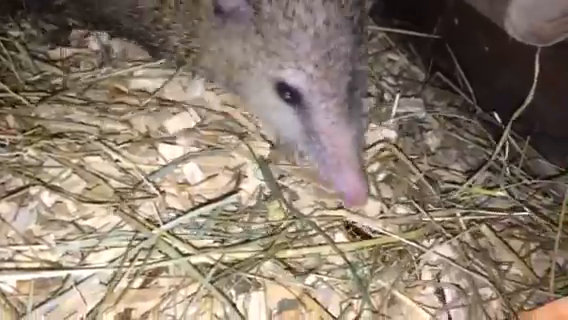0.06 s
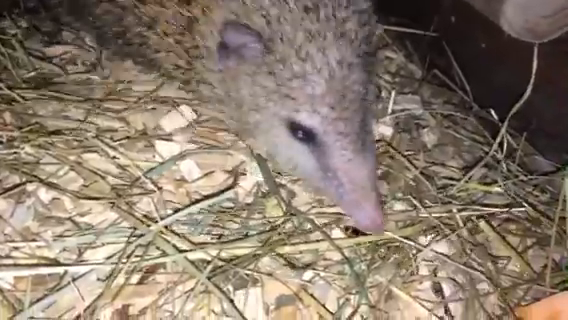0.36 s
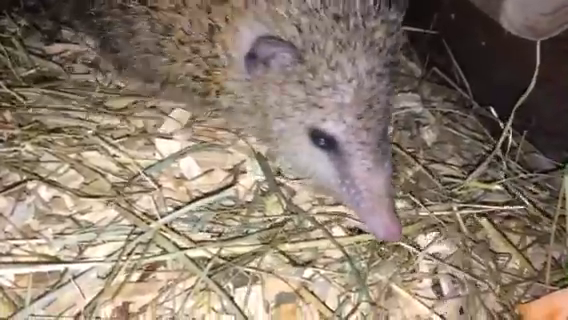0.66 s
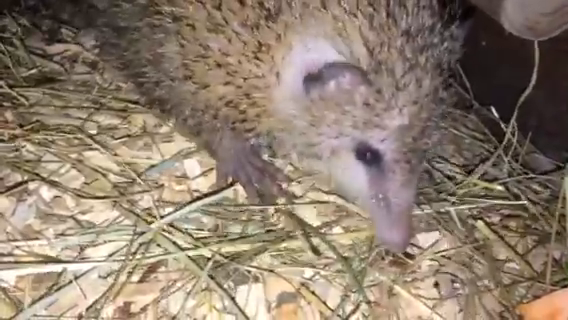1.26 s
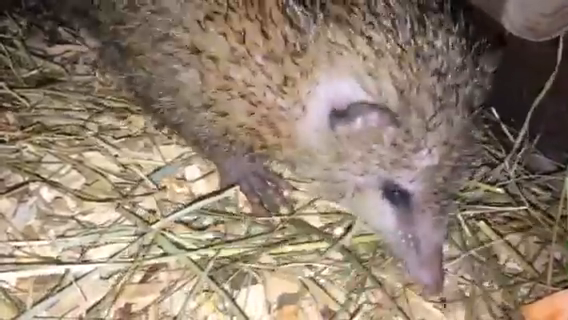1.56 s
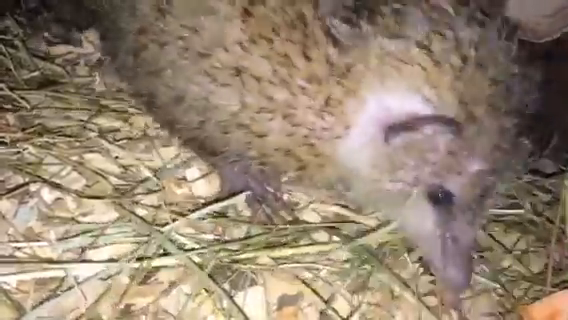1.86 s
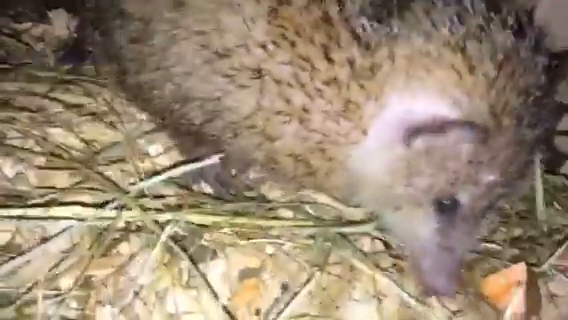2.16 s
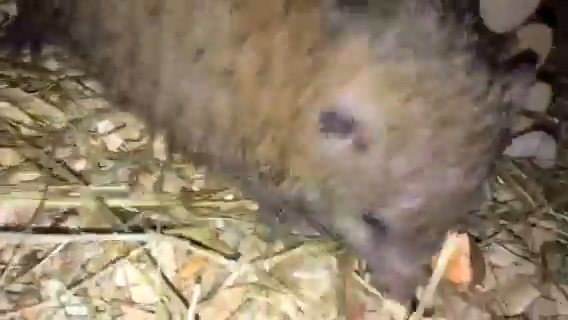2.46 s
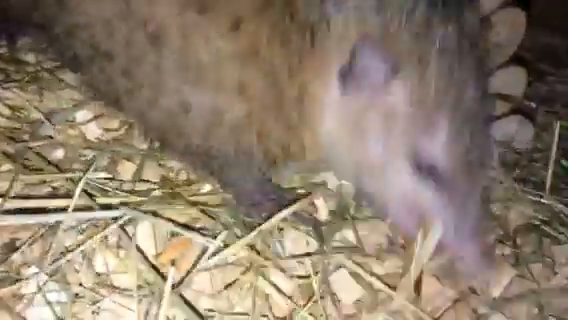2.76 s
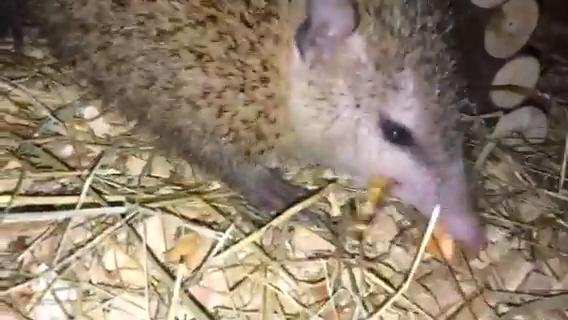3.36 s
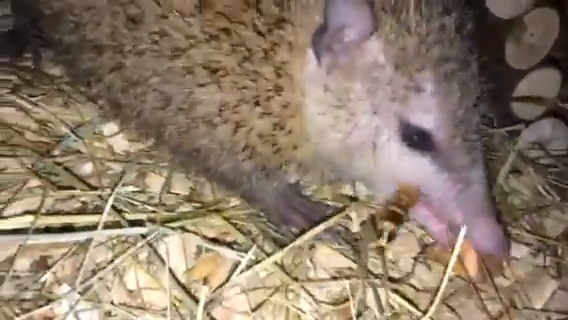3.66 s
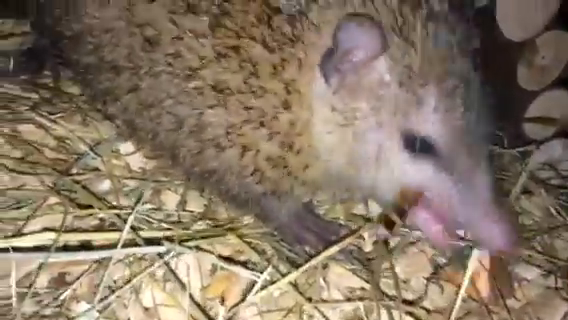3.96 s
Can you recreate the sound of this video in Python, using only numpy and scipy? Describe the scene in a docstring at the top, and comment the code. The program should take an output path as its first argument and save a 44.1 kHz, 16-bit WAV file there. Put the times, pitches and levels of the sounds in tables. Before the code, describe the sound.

A small animal sniffs and rustles through straw, then crunches a grub in wet bites.

```python
"""An indoor pen, where a small snouted animal noses through straw and wood shavings close by.
It sniffs in short puffs, stalks crackle as it stirs them, and its paws bump the hollow floor.
Then it seizes a grub and crunches it in five wet bites: the shell snaps and makes the mouth ring.
The pen walls add a short ring over a quiet room hum."""
import sys
import numpy as np
from scipy import signal
from scipy.fft import rfft, irfft
from scipy.io import wavfile

SR = 44100
rng = np.random.default_rng(int(sys.argv[2]) if len(sys.argv) > 2 else 0)


def master(y):
    """Save y as 16-bit WAV."""
    cut = np.clip(np.atleast_2d(y).T, -1, 1)
    pcm = np.round(cut * 32767)  # scale
    wavfile.write(sys.argv[1], SR, pcm.astype(np.int16))


N = 176400  # 4 seconds


def undb(db):
    """Turn decibels into a number to multiply by."""
    return 10 ** (np.asarray(db) / 20)


def unit(x):
    """Scale a sound to an average strength (rms) of 1."""
    return x / np.sqrt(np.mean(x ** 2))


def seconds(count):
    """The time of each sample, in seconds."""
    return np.arange(count) / SR


def add(out, start_s, x):
    """Mix x into out, beginning at start_s."""
    i = max(int(start_s * SR), 0)
    out[i:i + len(x)] += x[:max(N - i, 0)]


def curve(points):
    """A volume that glides through (time_s, level_db) points."""
    return undb(np.interp(seconds(N), *np.array(points).T))


def swell(peak_s, rise_s, fall_s):
    """A volume that rises and falls: 20 dB down at rise_s before the peak and fall_s after it."""
    t = seconds(N) - peak_s
    distance = np.abs(t / np.where(t < 0, rise_s, fall_s))
    return undb(-20 * np.minimum(distance ** 1.32, 10))


def wander(turns_per_s):
    """A value that drifts at random, mostly between -1 and 1."""
    return np.interp(seconds(N) * turns_per_s, np.arange(N), rng.standard_normal(N))


def colour(x, points, size=8192):
    """Make some pitches louder and others softer, following (pitch_hz, level_db) points."""
    hz, db = np.array(points).T
    grid_hz = np.arange(size // 2 + 1) * SR / size
    gains = undb(np.interp(np.log(grid_hz + 1), np.log(hz), db))
    # Build the filter so that nothing sounds ahead of the hit that causes it.
    cepstrum = irfft(np.log(gains))
    cepstrum[1:size // 2] *= 2
    cepstrum[size // 2 + 1:] = 0
    response = irfft(np.exp(rfft(cepstrum)))
    return signal.fftconvolve(x, response)[:len(x)]


def resonate(x, pitch_hz, width_hz):
    """Let a sound ring at one pitch; a narrower width rings longer."""
    return signal.lfilter(*signal.iirpeak(min(pitch_hz, SR / 2 - 1), pitch_hz / width_hz, fs=SR), x)


def grains(count, per_s=5500, spread_db=4):
    """A dense crackle of tiny breaks, very unequal in size."""
    breaks = rng.random(count) < per_s / SR
    signs = rng.choice([-1, 1], count)
    sizes = undb(spread_db * np.clip(rng.standard_normal(count), -2.5, 2.5))
    return unit(breaks * signs * sizes)


def room(noise_db=-68.5):
    """Steady room noise with a low, wavering hum."""
    # Notes of the hum: pitch_hz, level_db
    notes = [(60, -70), (72, -80.5), (166, -79.5)]
    # Tone of the room noise: pitch_hz, level_db
    tone = [(15, -26), (25, -6), (121, 2), (202, -9.5), (278, -7), (450, -15), (769, -19.5), (1060, -17.5),
            (1460, -24.5), (2130, -15), (2630, -28.5), (3350, -21), (3730, -26.5), (4500, -26.5),
            (5570, -26.5), (8550, -29.5), (15000, -37)]
    t = seconds(N)
    hum = sum(undb(db) * unit(np.sin(2 * np.pi * hz * t + 1.2 * wander(4.4))) for hz, db in notes)
    return hum + undb(noise_db) * unit(colour(rng.standard_normal(N), tone))


def reflections(x, early_s=0.004, pen_fade_s=0.072, room_fade_s=0.17):
    """Sound bounces off the floor and walls, dies fast in the pen and lingers faintly in the room."""
    # Tone of the echoes: pitch_hz, level_db
    tone = [(200, 5.5), (550, 9.5), (1000, -4.5), (1380, -12), (2000, 6), (2600, 2), (3600, -2), (4900, -6),
            (6500, 1.5), (8000, 1.5), (11000, -6), (15000, -2)]
    t, tail = seconds(14000), 0
    early = t < early_s
    pen_fade = undb(-60 * t / pen_fade_s)
    room_fade = undb(-60 * t / room_fade_s)
    for shape, db in ((early, -10.5), (pen_fade, -7), (room_fade, -21.5)):
        echoes = rng.standard_normal(len(t)) * shape * (t > 0.0005)
        tail = tail + undb(db) * echoes / np.linalg.norm(echoes)
    return signal.fftconvolve(x, colour(tail, tone))[:N]


def pen_ring(x, level_db=-2):
    """The pen rings briefly at its own pitches when a sound reaches them."""
    # Rings of the pen: pitch_hz, relative_db
    rings = [(655, -8), (960, -15), (1215, -4), (1865, -4), (2163, 1), (2425, -4), (2710, -7), (2950, 5),
             (3850, -8), (4085, 7), (5930, 7), (6240, -7), (6530, -11), (6878, -9), (7610, 2), (10040, -2),
             (10520, 6), (11100, -16)]
    return sum(undb(db + level_db) * resonate(x, hz, width_hz=60) for hz, db in rings)


def paws(thud_peak_s=0.011, ring_build_s=0.013, knock_fade_s=0.0094):
    """Each step bends the hollow floor with a thud and rings it; shifting weight keeps it rumbling."""
    # Steps on the floor: start_s, level_db, pitch_hz, knock_db (relative to the step)
    steps = [(0.037, -42.5, 164.6, -13.5), (0.081, -46.5, 141, -11), (.357, -53.5, 169, 0.5),
             (.812, -59, 166, -8), (0.848, -55, 173, -4), (0.964, -64, 150, -15), (1.075, -59, 122, -3),
             (1.473, -59, 129, -5), (1.514, -56, 164, 1), (1.784, -50.5, 162.6, -8),
             (1.812, -52.5, 162, -22), (1.861, -52.5, 134, -27), (1.937, -52.5, 169, -2),
             (2.067, -60.5, 193, -4), (2.1945, -30.5, 157, -20), (2.308, -52, 131, -26),
             (2.344, -46.5, 113, -28), (2.524, -42.5, 157, -6), (2.573, -41.5, 151, -14),
             (2.638, -41.5, 152, -3.5), (2.820, -30.5, 159.4, -22.5), (3.104, -53.5, 160, -19)]
    # Rings of the floor: pitch_hz, level_db, fade_s (time to drop 60 dB)
    floor_rings = [(56.2, -11, 0.26), (72.3, -28, 0.35), (167.6, -18, 0.38), (290, -17, 0.11),
                   (366, -16, .11), (480, -20, 0.092)]
    # Tone of a paw's knock: pitch_hz, level_db
    knock_tone = [(60, -19), (200, -14), (320, 6.5), (600, -13), (950, -17), (1900, -13), (3000, -43),
                  (12000, -56)]
    # Rumble of shifting weight: time_s, level_db
    shuffle = [(0, -59), (.3, -63), (.6, -70.5), (1, -63.5), (1.3, -74), (1.5, -61.5), (1.62, -75.5),
               (1.82, -58.5), (2.02, -73.5), (2.27, -62.5), (2.44, -65), (2.54, -53), (2.68, -51),
               (2.78, -58), (2.88, -58), (3, -69.5), (4, -70)]
    # Tone of the floorboards: pitch_hz, level_db
    board_tone = [(30, -34.5), (62, 0.5), (100, -15.5), (140, 1), (170, 6.5), (240, -19), (370, -4.5),
                  (600, -19.5), (1200, -25.5), (3000, -30.5), (12000, -73)]
    out, t = np.zeros(N), seconds(12000)
    bend = (t / thud_peak_s * np.exp(1 - t / thud_peak_s)) ** 2
    ring = sum(undb(db - 60 * t / fade_s) * np.sin(2 * np.pi * hz * t) for hz, db, fade_s in floor_rings)
    ring *= 1 - np.exp(-t / ring_build_s)
    for start_s, level_db, pitch_hz, knock_db in steps:
        thud = bend * np.sin(2 * np.pi * pitch_hz * t)
        knock = unit(colour(rng.standard_normal(len(t)), knock_tone)) * np.exp(-t / knock_fade_s)
        add(out, start_s, undb(level_db) * (thud + ring + undb(knock_db) * knock))
    rumble = unit(colour(grains(N), board_tone)) * curve(shuffle)
    return out + rumble * undb(1.25 * wander(25.09))


def wood_knocks(clatter_db=-6.5, clatter_fade_s=0.0046):
    """Knocked wood gives a hollow tock: one fast-fading note and a burst of clatter."""
    # Knocks in the pen: start_s, level_db, fade_s, pitch_hz
    knocks = [(0.3563, -55.5, 0.0044, 402), (.8500, -41.5, 0.0047, 290), (1.778, -52.5, 0.0093, 407),
              (2.072, -56.5, 0.0053, 377), (2.638, -51.5, 0.0065, 480), (2.910, -52.5, 0.0069, 920)]
    # Tone of the clatter: pitch_hz, level_db
    tone = [(150, -7), (350, 2), (600, -1), (950, 1), (1350, -13), (1900, -15.5), (3000, -27), (12000, -37)]
    out, t = np.zeros(N), seconds(2048)
    for start_s, level_db, fade_s, pitch_hz in knocks:
        note = np.sin(2 * np.pi * pitch_hz * t) * np.exp(-t / fade_s)
        clatter = unit(colour(rng.standard_normal(len(t)), tone)) * np.exp(-t / clatter_fade_s)
        add(out, start_s, undb(level_db) * (note + undb(clatter_db) * clatter))
    return out


def scrapes():
    """The snout pushes shavings over the floor with a dull rubbing sound."""
    # Pushes of the snout: peak_s, level_db, rise_s, fall_s
    pushes = [(1.742, -64, 0.047, 0.027), (2.195, -66.5, 0.034, 0.017), (2.725, -59, 0.082, 0.038),
              (2.91, -61, .01, 0.013)]
    # Tone of the rubbing: pitch_hz, level_db
    tone = [(150, -38), (450, -1), (1000, -2.5), (1750, 8), (2400, -23), (6000, -26)]
    volume = sum(undb(db) * swell(peak_s, rise_s, fall_s) for peak_s, db, rise_s, fall_s in pushes)
    return unit(colour(grains(N), tone)) * volume


def straw(flicker_db=2.5, stalks_per_s=90, stalks_db=-7):
    """Straw crackles when stirred, louder when crushed; single stalks tick above the rest."""
    # Stirring of the straw: time_s, level_db
    stirring = [(0, -67.5), (.1, -73), (.53, -68.5), (.63, -81), (.88, -74), (1.05, -73), (1.13, -77.5),
                (1.38, -77.5), (1.46, -66), (1.52, -59.5), (1.56, -80), (1.69, -79), (1.77, -64),
                (1.88, -63), (1.99, -74.5), (2.07, -71.5), (2.15, -60.5), (2.24, -61.5), (2.35, -76),
                (2.44, -61.5), (2.56, -55.5), (2.66, -57), (2.8, -59), (2.88, -62.5), (2.94, -61),
                (3.01, -82), (3.12, -62.5), (3.2, -71), (3.4, -70.5), (4, -75)]
    # Crushes under a paw or the snout: peak_s, level_db, rise_s, fall_s
    crushes = [(0.035, -54.5, 0.012, 0.012), (.075, -65, 0.026, 0.026), (.28, -77, 0.067, 0.02),
               (2.193, -46.5, .016, 0.02), (2.8212, -44, 0.0098, 0.012), (2.91, -54, .006, 0.0088)]
    # Tone of the straw: pitch_hz, level_db
    tone = [(150, -19), (500, -3), (1000, 3), (1700, 2.5), (2400, -4.5), (4000, 3), (8000, -0.5),
            (12000, 1), (15000, 3.5)]
    volume = curve(stirring) * undb(flicker_db * wander(70))
    volume += sum(undb(db) * swell(peak_s, rise_s, fall_s) for peak_s, db, rise_s, fall_s in crushes)
    stalks = unit((rng.random(N) < stalks_per_s / SR) * rng.standard_normal(N))
    crackle = grains(N) + undb(stalks_db) * stalks
    return unit(colour(crackle, tone)) * volume


def sniffs(nose_db=0.5):
    """Short puffs of air hiss through the snout, each strongest around its own pitch."""
    # Puffs of air: peak_s, level_db, rise_s, fall_s, pitch_hz
    puffs = [(.93, -62.5, 0.0085, .015, 3180), (.958, -60, 0.012, 0.013, 4400),
             (1.04, -69.5, 0.054, 0.032, 3000), (1.28, -71.5, 0.064, 0.033, 4200),
             (1.725, -55.5, 0.02, 0.016, 3780), (1.745, -48, 0.024, 0.017, 4070),
             (1.823, -59.5, 0.0082, 0.014, 5000), (1.921, -50.5, 0.059, 0.024, 4370),
             (2.04, -59.5, 0.02, 0.011, 4800), (2.112, -60.5, .03, 0.013, 3980),
             (2.283, -60.5, 0.025, 0.032, 4870), (2.707, -43.5, 0.011, 0.098, 4860),
             (2.742, -64, 0.017, 0.04, 4400), (3.097, -48, 0.048, 0.017, 3900),
             (3.254, -53.5, 0.054, 0.015, 3400), (3.55, -68, 0.055, .012, 10500),
             (3.662, -55.5, 0.026, 0.013, 2900), (3.782, -74, .025, 0.013, 3470),
             (3.901, -64, 0.018, .009, 3970)]
    # Tone of the rushing air: pitch_hz, level_db
    tone = [(200, -19.5), (800, -1), (1700, -2.5), (2400, -5.5), (3100, 1.5), (6000, 1.5), (8000, 0.5),
            (14500, 4), (16000, -2.5)]
    out = np.zeros(N)
    air = colour(rng.standard_normal(N), tone)
    for peak_s, level_db, rise_s, fall_s, pitch_hz in puffs:
        hiss = unit(air + undb(nose_db) * resonate(air, pitch_hz, width_hz=2400))
        out += undb(level_db) * swell(peak_s, rise_s, fall_s) * hiss
    return out


def squelches(width_hz=1100):
    """Saliva fizzes briefly in a small pocket of the mouth."""
    # Wet mouth sounds: peak_s, level_db, half_length_s, pitch_hz
    bursts = [(2.688, -52.5, 0.0035, 4300), (2.908, -55.5, .007, 970), (3.257, -36, .003, 3130),
              (3.438, -59, 0.0036, 3460), (3.443, -56, 0.0035, 10500), (3.451, -47.5, 0.0068, 2960),
              (3.543, -58.5, .011, 10700), (3.651, -58, .003, 2800), (3.77, -66, 0.0058, 3830),
              (3.786, -67.5, 0.016, 3200), (3.880, -67, .005, 4700), (3.89, -70, .005, 4000),
              (3.899, -57, .004, 8600)]
    out, fizz = np.zeros(N), rng.standard_normal(N)
    for peak_s, level_db, half_length_s, pitch_hz in bursts:
        pocket = resonate(resonate(fizz, pitch_hz, width_hz), pitch_hz, width_hz)
        out += undb(level_db) * swell(peak_s, half_length_s, half_length_s) * unit(pocket)
    return out


def ticks(fade_s=0.00042, crack_db=-10.5):
    """Lips, tongue and stalks make small clicks: a tiny crack with a very short ring."""
    # Single clicks: start_s, level_db, pitch_hz
    clicks = [(.016, -32, 8900), (.033, -45, 9100), (.134, -32, 6760), (.357, -29, 3900),
              (.545, -40, 13000), (.957, -27, 5060), (1.793, -29, 13500), (1.83, -35, 13500),
              (1.943, -23.5, 5500), (2.117, -31, 11000), (2.133, -27, 6900), (2.191, -13.5, 11700),
              (2.1938, -13.5, 12000), (2.239, -24.5, 10800), (2.638, -22, 5040), (2.788, -22, 10800),
              (2.822, -26, 12000), (2.946, -32, 10100), (2.966, -37, 12000), (2.983, -30, 12000),
              (3.0525, -19, 5070), (3.304, -32, 9000), (3.329, -29.5, 10500), (3.387, -36, 6500),
              (3.5122, -23, 11400), (3.5532, -21, 10900), (3.578, -31, 3480), (3.6343, -28, 10700),
              (3.7372, -26, 2580), (3.8158, -27, 5650), (3.8605, -34.5, 5200)]
    out, t = np.zeros(N), seconds(512)
    for start_s, level_db, pitch_hz in clicks:
        burst = rng.standard_normal(len(t)) * np.exp(-t / fade_s)
        crack = burst * undb(level_db) / np.linalg.norm(burst) / 2
        add(out, start_s, resonate(crack, pitch_hz, width_hz=2300) + undb(crack_db) * crack)
    return out


def bites(middle_db=-2, high_db=-0.5):
    """The grub's shell snaps and crumbles; each break rings the mouth at a low, middle and high pitch."""
    # Shell snaps: start_s, level_db, crumble_s, crumble_db, low_hz, low_db, middle_hz, high_hz
    snaps = [(3.0840, -10.5, 0.0083, 3.5, 3700, -0.5, 5100, 9500),
             (3.256, -7.5, 0.0038, 1.5, 3240, -7.5, 7400, 10200),
             (3.2639, -3, .005, 1.5, 2530, -4, 6350, 9900),
             (3.2663, -2, 0.00072, 5.5, 2470, -33, 6200, 9900),
             (3.2785, -19.5, .004, -5, 2180, 8, 6500, 11000),
             (3.45, -14.5, 0.0017, 3, 3030, 0, 6760, 10500),
             (3.4545, -8, 0.0055, 4, 3060, -0.5, 6340, 9900),
             (3.4583, -14, 0.0022, 0.5, 2820, 7.5, 6400, 10400),
             (3.463, -12.5, 0.0049, 3, 2090, -6, 6900, 10400),
             (3.4719, -17, 0.0016, -11, 2040, 3.5, 7000, 11500),
             (3.475, -17.5, 0.0024, -17, 2050, 1, 6300, 8800),
             (3.6583, -19, 0.0022, -7, 2410, 5, 6500, 12000),
             (3.6718, 3.5, 0.00035, -6.5, 1940, -2.5, 7200, 11300),
             (3.679, -16.5, 0.00055, 5.5, 1220, 6, 7340, 12500),
             (3.9053, -26, 0.0029, 0, 2920, 4, 7000, 11000),
             (3.9222, -0.5, 0.00059, -11.5, 1800, -2.5, 7260, 11400)]
    # Tone of the bare crack: pitch_hz, level_db
    shell_tone = [(150, -18), (500, -25.5), (1000, -11), (2000, -25.5), (4500, -18), (9000, -18.5),
                  (14000, -18), (16000, -25)]
    mouth_ring, cracks, t = np.zeros(N), np.zeros(N), seconds(2048)
    snap = t == 0  # a click one sample long
    for start_s, level_db, crumble_s, crumble_db, low_hz, low_db, middle_hz, high_hz in snaps:
        crumbs = grains(len(t)) * np.exp(-t / crumble_s)
        crumbs /= np.linalg.norm(crumbs) + 1e-9
        crack = undb(level_db) * (snap + undb(crumble_db) * crumbs) / 2
        low = undb(low_db) * resonate(crack, low_hz, width_hz=910)
        middle = undb(middle_db) * resonate(crack, middle_hz, width_hz=1360)
        high = undb(high_db) * resonate(crack, high_hz, width_hz=1430)
        add(cracks, start_s, crack)
        add(mouth_ring, start_s, low + middle + high)
    return mouth_ring + colour(cracks, shell_tone)


def scene():
    """The raised mouth makes the pen ring; sounds down in the bedding echo less."""
    mouth = bites() + ticks() + squelches()
    bedding = undb(1.5) * (sniffs() + straw() + scrapes()) + wood_knocks()
    echoes = reflections(mouth + undb(-4) * bedding)
    return (mouth + pen_ring(mouth) + bedding + echoes + paws() + room())[None]  # one channel


def record(dry, low_cut_hz=22, high_cut_hz=15250):
    """Cut away the deepest bass and the highest treble."""
    bass_cut = signal.butter(2, low_cut_hz, "highpass", fs=SR, output="sos")
    treble_cut = signal.ellip(10, 0.2, 70, high_cut_hz, fs=SR, output="sos")
    return signal.sosfilt(treble_cut, signal.sosfilt(bass_cut, dry))


dry = scene()
out = record(dry)
master(out)
```